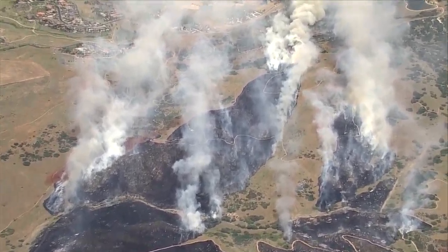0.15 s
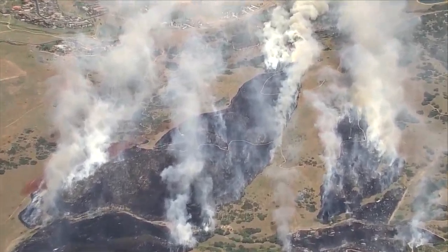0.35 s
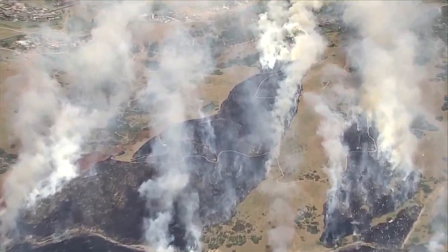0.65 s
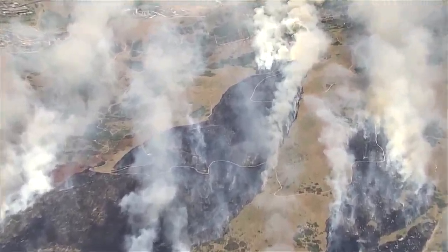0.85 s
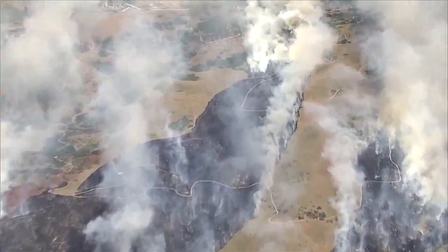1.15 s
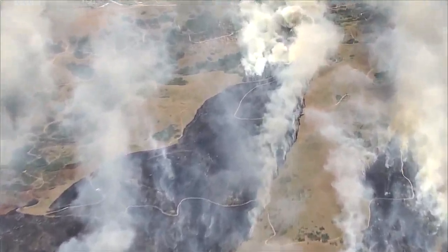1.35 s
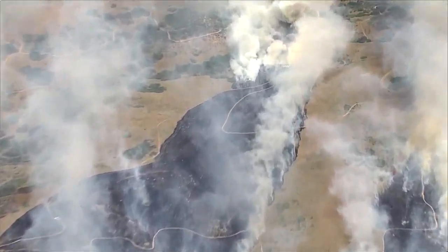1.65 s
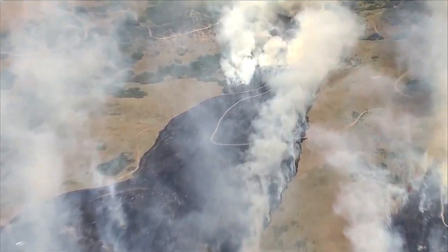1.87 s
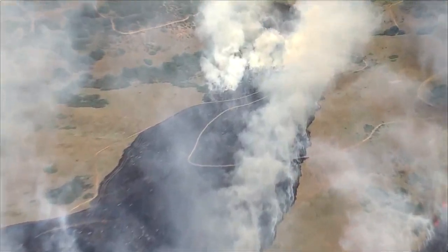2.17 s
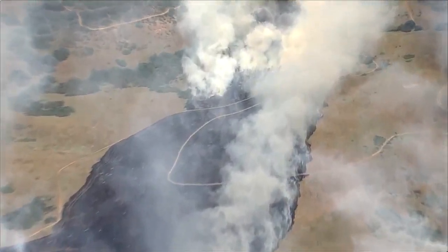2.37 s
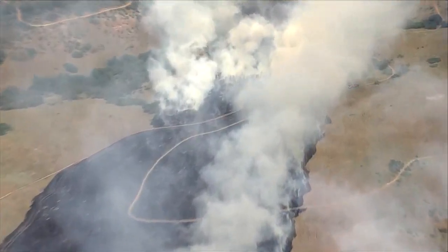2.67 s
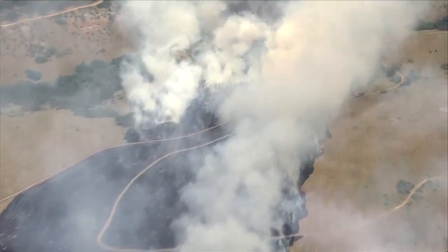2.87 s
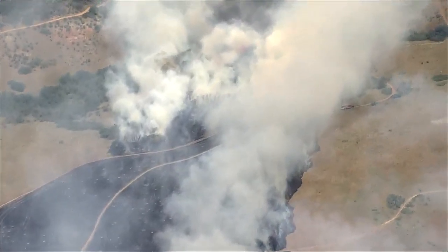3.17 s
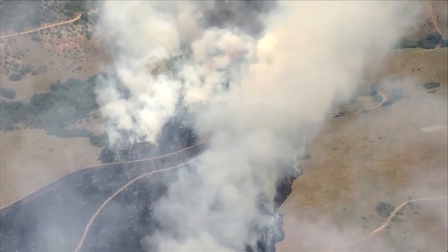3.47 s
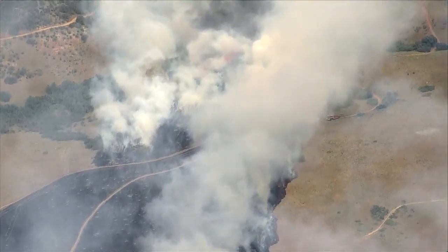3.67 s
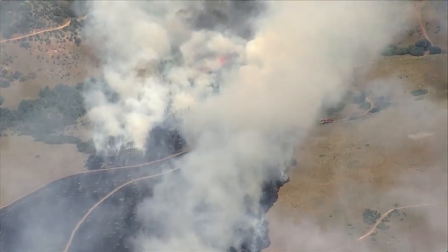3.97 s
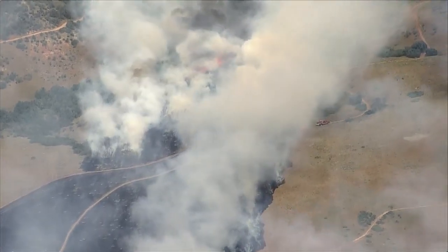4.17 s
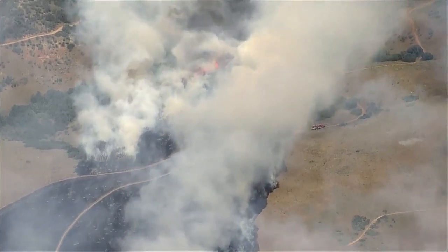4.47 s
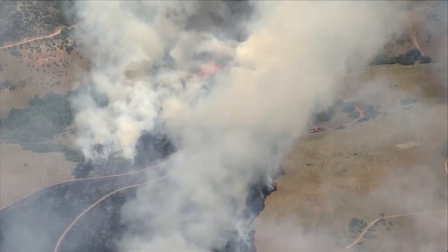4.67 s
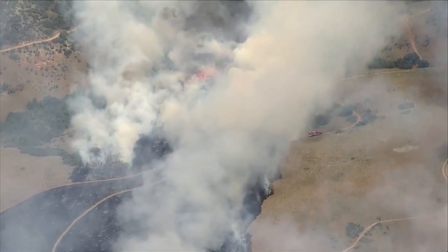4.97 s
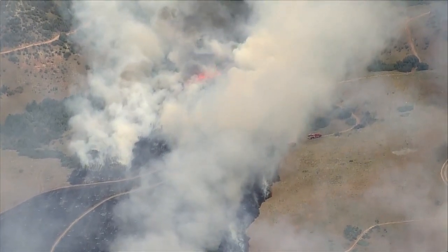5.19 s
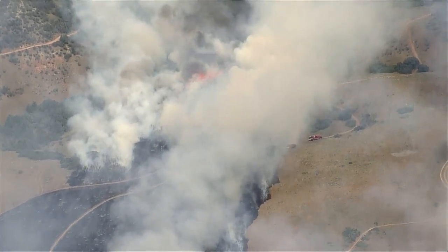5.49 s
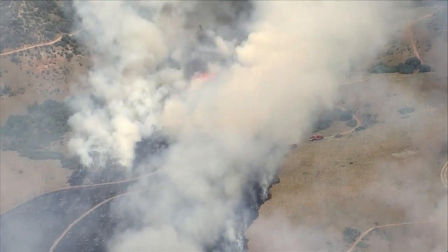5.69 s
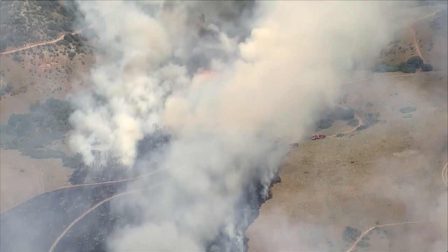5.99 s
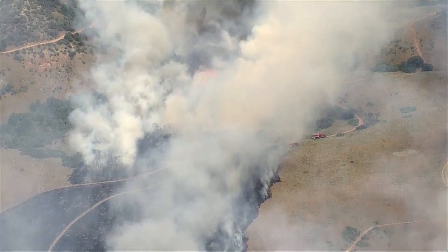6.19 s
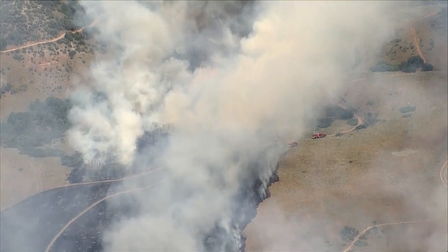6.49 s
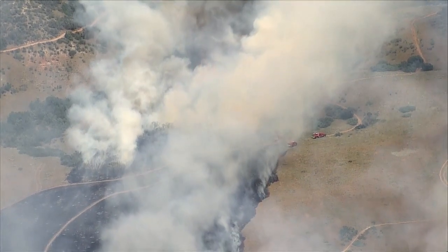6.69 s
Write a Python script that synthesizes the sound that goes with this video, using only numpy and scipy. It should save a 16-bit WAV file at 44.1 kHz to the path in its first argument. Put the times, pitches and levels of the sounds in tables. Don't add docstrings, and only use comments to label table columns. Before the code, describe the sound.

From 0 to about 7 seconds, a faint, unbroken drone from the cabin of a turbine helicopter in cruise, flying over smoking grassland. A low fan hum near 70 Hz and muffled rumble form the base. Above sit steady gear whines, strongest around 650, 1700 and 3300 Hz, with weaker tones between and above. Their pitch scarcely drifts, but they shimmer and throb several times a second. A soft broad rush of air fills the gaps. A tiny turbine whistle near 9 kHz swells and fades, dipping around 3.1 seconds and near the end. The thinnest top treble flutters on and off in tiny irregular steps, frequent early on, sparser around 5.8 to 6.3 seconds, then almost absent. The sound is close, dry and narrow, like a weak radio-linked camera microphone. No fire crackle, no distinct blade chop, no ending event.

```python
import sys
import numpy as np
from scipy import signal
from scipy.fft import rfft, irfft, next_fast_len
from scipy.io import wavfile
from scipy.ndimage import uniform_filter1d

SR = 44100
rng = np.random.default_rng(int(sys.argv[2]) if len(sys.argv) > 2 else 0)


def master(y):
    cut = np.clip(np.atleast_2d(y).T, -1, 1)
    pcm = np.round(cut * 32767)
    wavfile.write(sys.argv[1], SR, pcm.astype(np.int16))


def linear_from_db(decibels):
    return 10 ** (np.asarray(decibels, float) / 20)


N = 301644
T = np.arange(N) / SR

# f/Hz, level/dB
RUMBLE_SPECTRUM = [(20, -17.5), (27, -15.5), (31, -12), (36, -2), (46, -19.5), (55, -10), (64, -2),
                   (100, 0), (210, -4), (250, -2), (320, -7), (410, 1.5), (480, -8.5), (900, -22)]
# f/Hz, level/dB
RUSH_SPECTRUM = [(300, -9.5), (620, 0.5), (850, 1), (1060, -3.5), (1300, 1.5), (1720, -2.5), (2000, -1),
                 (2400, 1.5), (3300, -2), (3900, -5.5), (5150, -6.5), (5450, -8.5), (6000, -8.5),
                 (8000, -19.5)]
# f/Hz, width/Hz, depth/dB
MICROPHONE_DIPS = [(4250, 150, 1.5), (4850, 130, 2), (5440, 120, 3.5), (7400, 400, 3.5), (8250, 400, 2),
                   (10050, 250, 2)]
CABIN_MODE_HZ, CABIN_MODE_WIDTH_HZ, CABIN_MODE_DB, CABIN_SIDES_DB = 404, 16, 4, -2.5
# t/s, f/Hz, level/dB (rms)
CORE_WHISTLE = [(0, 8820, -89.5), (.24, 8833, -82), (.55, 8842, -82.5), (.8, 8838, -79),
                (1.22, 8817, -81.5), (1.9, 8805, -86), (2.3, 8812, -81), (2.7, 8818, -80.5),
                (3.1, 8813, -93), (3.62, 8823, -80), (3.95, 8816, -85), (4.4, 8811, -89),
                (4.66, 8806, -81.5), (5.1, 8813, -89), (5.37, 8823, -78.5), (5.72, 8830, -79.5),
                (6.11, 8820, -81.5), (6.45, 8807, -94)]
# t/s, blade f/Hz
FAN_SPEED = [(0, 69.7), (.6, 69.97), (1.15, 69.63), (1.85, 70.68), (2.25, 70.02), (2.68, 70.03),
             (2.93, 70.22), (3.22, 69.72), (3.95, 69.72), (4.4, 70.14), (4.68, 69.58), (5.13, 69.68),
             (5.6, 70.46), (5.9, 69.95), (6.15, 69.96), (6.84, 70.36)]
# multiple of blade f, level/dB
FAN_HARMONICS = [
    (.5, -31.5),
    (1, 1.5),
    (2, -5.5),
    (3, -13),
]
FAN_DB, FAN_SWELL_DB = -59, .5

ROTOR_HZ = 6.525
# t/s, departure/(parts per thousand)
ROTOR_DRIFT = [(0, -.65), (.15, -.92), (.72, 0), (1.03, -.17), (1.72, .79), (2.28, .05), (2.68, .43),
               (3.15, -.04), (3.68, .59), (4.26, .59), (4.6, .46), (5.04, -.33), (5.45, -.09), (5.76, .46),
               (6.02, .18), (6.42, .6), (6.7, .62), (6.84, .35)]
MESH_LOAD = {"bevel": (-0.86, 2.7, -0.3), "fourth": (1.2, 1.1, -0.63), "fifth": (0.74, -1.3, -0.14),
             "seventh": (.8, -1.2, -.12)}
# rotor order, level/dB (rms)
PUMP_LINES = [(208.0, -81.3), (260.0, -62.1), (468.0, -76.7), (520.0, -84.1), (572.0, -82.3),
              (624.0, -80.6), (676.0, -82.8), (780.0, -83.0), (884.0, -76.2), (936.0, -85.0),
              (988.0, -92.8), (1092.0, -95.9), (1300.0, -98.9)]
TAIL_LEVELS = [-77, -79, -78, -78, -80, -76]
TAIL_ORDER = 10.6
# rotor order, level/dB (rms)
SHAFT_LINES = [(5.99, -68.2), (9.0, -78.0), (15.55, -72.9), (95.82, -79.4), (106.78, -76.4),
               (171.04, -79.5), (177.66, -81.8), (221.0, -83.5), (224.25, -79.9), (279.88, -83.2),
               (295.42, -85.3), (440.0, -84.8), (810.0, -89.3), (875.56, -91.2), (885.01, -87.3),
               (886.29, -90.2), (914.34, -90.7), (923.0, -88.9), (932.94, -75.5), (944.99, -81.0),
               (951.6, -83.3), (959.34, -92.3), (1047.46, -88.8), (1057.34, -92.9), (1136.59, -86.2),
               (1143.19, -86.0), (1156.37, -87.7), (1162.98, -93.9), (1176.99, -94.6), (1258.85, -99.6),
               (5.3, -85.0), (139.12, -82.7), (147.33, -86.7), (160.0, -88.6), (186.71, -85.7),
                   (233.24, -85.6), (248.78, -86.3), (322.89, -86.5), (380.11, -84.6), (389.86, -82.8),
                   (529.74, -84.9), (539.99, -88.6), (649.99, -89.1), (760.0, -90.8), (785.0, -89.4),
                   (815.0, -95.2), (964.78, -92.3), (992.33, -94.5), (1026.23, -96.6), (1040.8, -93.7),
                   (1067.15, -97.7), (1109.73, -101.1), (1169.58, -98.9), (1177.49, -96.1),
                   (1189.84, -100.4), (1239.06, -100.7), (1252.22, -99.7), (1334.84, -101.3)]
FADE_DB, FADE_DB_PER_ORDER, FADES_PER_S = 1, .002, 1
# rotor order, level/dB (rms)
BEVEL_LINES = [(225.33, -84.7), (238.33, -79.0), (242.67, -81.7), (256.33, -82.8), (263.33, -71.4),
               (264.33, -54.0), (266.33, -82.3), (267.33, -81.6), (270.33, -77.4), (273.33, -84.5),
               (276.33, -83.6), (317.67, -87.0), (335.67, -80.7), (364.33, -83.4), (367.33, -80.3),
               (459.33, -86.0), (464.33, -85.7), (472.33, -87.3), (525.67, -85.5), (528.67, -72.6),
               (619.67, -88.5), (664.33, -86.3), (680.33, -91.5), (775.67, -87.2), (784.33, -89.6),
               (788.67, -88.3), (827.67, -98.2), (836.33, -91.6)]
BEVEL_MESH = 793 / 3
# rotor order, level/dB (rms)
PLANET_LINES = [(100.0, -56.5), (101.0, -81.2), (105.0, -84.3), (195.0, -81.3), (197.0, -80.8),
                (199.0, -79.9), (200.0, -72.0), (201.0, -76.2), (203.0, -83.7), (206.0, -82.2),
                (298.0, -82.8), (300.0, -70.3), (302.0, -82.6), (394.0, -84.2), (395.0, -83.6),
                (397.0, -84.9), (399.0, -77.1), (400.0, -62.0), (401.0, -76.5), (402.0, -78.4),
                (403.0, -79.7), (494.0, -83.7), (495.0, -72.5), (496.0, -83.3), (497.0, -85.2),
                (500.0, -59.0), (501.0, -79.9), (503.0, -85.5), (504.0, -84.8), (505.0, -76.9),
                (595.0, -82.5), (596.0, -87.3), (598.0, -87.2), (599.0, -85.5), (600.0, -79.1),
                     (601.0, -87.4), (602.0, -78.1), (605.0, -82.0), (695.0, -75.7), (698.0, -85.8),
                     (700.0, -65.6), (702.0, -88.4), (793.0, -78.1), (795.0, -77.7), (800.0, -84.8),
                     (802.0, -88.3), (805.0, -83.4), (895.0, -84.5), (898.0, -88.0), (900.0, -78.5),
                     (902.0, -83.6), (905.0, -84.0), (995.0, -93.8), (998.0, -85.5), (1003.0, -82.5),
                     (1004.0, -91.2), (1005.0, -87.3), (1195.0, -97.0), (1205.0, -102.2), (1305.0, -101.2)]
PLANET_PHASE = {200: -.46, 500: .3, 600: .45, 700: -.23, 800: .41, 900: -.13}

# from t/s, to t/s, share of frames sent (0-1)
TOP_SPELLS = [(0, .115, .8), (.26, .91, .79), (1.12, 1.24, .8), (1.34, 1.65, .92), (1.72, 2.47, .52),
              (2.585, 2.61, 1), (2.73, 3.5, .53), (3.52, 3.74, .78), (3.76, 4.2, .89), (4.22, 4.34, .6),
              (4.36, 4.55, 1), (4.6, 5.11, .48), (5.2, 5.44, .7), (5.51, 5.755, .9), (5.82, 6.31, .33),
              (6.64, 6.66, 1)]
UPPER_LOST = [1.579, 2.971, 3.283, 3.907, 4.363, 6.187, 6.451, 6.643]
# from t/s, to t/s
GAP_SENT = [(.155, .18), (.2, .245), (.73, .765), (4.075, 4.1)]
# f/Hz, level/dB
LINE_HISS = [(9000, -0.5), (11300, -11), (11900, 0.5), (14100, 0), (14600, -10), (22000, -13)]
FRAME_S, FIRST_FRAME_S, BIT_JITTER = .024, -.005, 1.3


def unit(x):
    return x / np.sqrt(np.mean(x ** 2) + 1e-20)


def curves(rows):
    s, *cols = np.transpose(rows)
    return [np.interp(T, s, c) for c in cols]


def wobble(rate):
    knots = int(N * rate / SR) + 4
    return np.interp(T * rate, np.arange(knots), rng.standard_normal(knots))


def waver(db, rate):
    knots = int(N * rate / SR) + 2
    gains = linear_from_db(db * rng.standard_normal(knots))
    slow = np.interp(T[::32] * rate, np.arange(knots), gains)
    return np.repeat(unit(slow).astype(np.float32), repeats=32)[:N]


def bell(hz, centre_hz, width_hz):
    return np.exp(-((hz - centre_hz) / width_hz) ** 2)


def filtered(x, response):
    m = next_fast_len(N + 8192, True)
    gain = response(np.fft.rfftfreq(m, 1 / SR)).astype(np.float32)
    return irfft(rfft(x.astype(np.float32), m) * gain, m)[:N]


def noise(spectrum):
    f, db = np.transpose(spectrum)
    response = lambda hz: linear_from_db(np.interp(np.log(hz + 1), np.log(f), db))
    return unit(filtered(rng.standard_normal(N), response))


def band(x, lo_hz, hi_hz, edge_hz):
    step = lambda u: np.sin(np.pi / 2 * np.clip(u / edge_hz + .5, 0, 1)) ** 2
    return filtered(x, lambda hz: step(hz - lo_hz) * step(hi_hz - hz))


def tone(turns, db, start=None):
    cycles = turns + (rng.random() if start is None else start)
    cycles -= np.floor(cycles)
    return np.float32(np.sqrt(2) * linear_from_db(db)) * np.sin(np.float32(2 * np.pi) * cycles.astype(np.float32))


def airflow():
    def cabin(hz):
        mode_db = CABIN_MODE_DB * bell(hz, CABIN_MODE_HZ, CABIN_MODE_WIDTH_HZ)
        sides_db = CABIN_SIDES_DB * bell(hz, CABIN_MODE_HZ, 4 * CABIN_MODE_WIDTH_HZ)
        return linear_from_db(-1.5 * bell(hz, 135, 25) + mode_db + sides_db)

    def microphone(hz):
        return linear_from_db(-sum(db * bell(hz, dip_hz, width_hz) for dip_hz, width_hz, db in MICROPHONE_DIPS))

    rumble_db = -60.5 + 0.28 * wobble(1.5) + 0.71 * wobble(9.5)
    rumble = linear_from_db(rumble_db) * filtered(noise(RUMBLE_SPECTRUM), cabin)
    casing = linear_from_db(-71.5) * unit(band(rng.standard_normal(N), 1665, 1760, 30))
    rush_db = -59 + 0.53 * wobble(1.4) + 0.62 * wobble(25)
    rush = linear_from_db(rush_db) * filtered(noise(RUSH_SPECTRUM), microphone)
    return rumble + casing + rush


def turbine_core():
    hz, db = curves(CORE_WHISTLE)
    turns = np.cumsum(hz + 1.8 * wobble(20)) / SR
    turns_13 = turns * 13 / 11
    order_11 = tone(turns, db + 2.5) + tone(18000 * T - turns, db + 2)
    order_13 = tone(turns_13, -79.5 + 2.5 * wobble(5))
    mirror_13 = tone(21000 * T - turns_13, -80 + 2.5 * wobble(5))
    return order_11 + order_13 + mirror_13


def fan():
    hz, = curves(FAN_SPEED)
    turns = np.cumsum(hz) / SR + .006 * wobble(9)
    blades = [tone(k * turns, level + 0.3 * wobble(8.4), 1 / 4) for k, level in FAN_HARMONICS]
    return linear_from_db(FAN_DB + FAN_SWELL_DB * wobble(2)) * sum(blades)


def rotor_turns():
    turns = np.cumsum(ROTOR_HZ * (1 + curves(ROTOR_DRIFT)[0] / 1000)) / SR
    shiver = 6e-5 * np.sin(2 * np.pi * .7 * turns) + 5e-5 * np.sin(2 * np.pi * 1.09 * turns)
    return turns + shiver


def load_db(mesh):
    start_db, db_per_thousandth, db_per_s = MESH_LOAD[mesh]
    return start_db + db_per_thousandth * curves(ROTOR_DRIFT)[0] + db_per_s * T


def shafts(turns):
    pump = sum(tone(order * turns, db, .34 * order / 260) * waver(.6, 3) for order, db in PUMP_LINES)
    tail = sum(tone((k + 1) * TAIL_ORDER * turns, db, 1 / 4) * waver(.8, 3)
               for k, db in enumerate(TAIL_LEVELS))
    lone = np.zeros(N, np.float32)
    for order, db in SHAFT_LINES:
        fade_db = FADE_DB + FADE_DB_PER_ORDER * order
        lone += tone(order * turns, db + 1.34) * waver(fade_db, FADES_PER_S)
    return pump + tail + lone


def bevel_mesh(turns):
    out = np.zeros(N, np.float32)
    for order, db in BEVEL_LINES + [(BEVEL_MESH + 1, -76)]:
        side = round(order - BEVEL_MESH, 1)
        exact = round(3 * order) / 3
        start = .37 * side if abs(side) <= 1 else None
        out += tone(exact * turns, db, start) * waver(.5, 3)
    return linear_from_db(load_db("bevel") + 0.83 + 0.33 * wobble(9)) * out


def planet_stage(turns):
    swell = {4: linear_from_db(load_db("fourth")), 5: linear_from_db(load_db("fifth")), 7: linear_from_db(load_db("seventh"))}
    lag = rng.random((15, 9))
    out = np.zeros(N, np.float32)
    for order, db in PLANET_LINES:
        mesh = round(order / 100)
        side = round(order - 100 * mesh)
        delay = lag[mesh, abs(side)]
        if abs(side) == 5:
            delay = PLANET_PHASE.get(100 * mesh, 0)
        start = lag[mesh, 0] - np.sign(side) * delay
        if mesh == 4 and side != 0:
            start -= 1 / 4
        line = tone(order * turns, db + 0.14 * mesh / 2, start)
        out += line * waver(0.5 + 0.03 * mesh, 3.495) * swell.get(mesh, 1)
    return out


def scene():
    turns = rotor_turns()
    background = airflow() + turbine_core() + fan()
    return (background + shafts(turns) + bevel_mesh(turns) + planet_stage(turns))[None]


def frames(spans):
    on = np.zeros(N)
    for start, stop in spans:
        on[round(start * SR):round(stop * SR)] = 1
    return uniform_filter1d(uniform_filter1d(on, size=180), size=180)


def top_frames():
    starts = np.arange(FIRST_FRAME_S, N / SR, FRAME_S)
    costs = 1 / 2 + BIT_JITTER * (rng.random(len(starts)) - 1 / 2)
    middles = starts + FRAME_S / 2
    sent = []
    for first, last, share in TOP_SPELLS:
        inside = (middles > first) & (middles < last)
        spare = 1
        for s, cost in zip(starts[inside], costs[inside]):
            if spare >= cost or share == 1:
                sent.append((max(s, 0), s + FRAME_S))
                spare -= 1
            spare += share
    return frames(sent)


def radio_link(x):
    top_on = top_frames()
    lost = band(frames((s, s + FRAME_S) for s in UPPER_LOST) * x, 8250, SR, 300)
    low = band(x - lost, -100, 8960, 640)
    gap = linear_from_db(-8) * band(frames(GAP_SENT) * x, 9200, 9750, 400)
    switched = band(top_on * band(x, 9500, 10900, 300), 9000, 10570, 330)
    top = linear_from_db(-2) * band(switched, 9800, SR, 640)
    image = linear_from_db(-104.5) * top_on * unit(band(rng.standard_normal(N), 15000, 15750, 300))
    return low + gap + top + image + linear_from_db(-93) * noise(LINE_HISS)


def low_pass(x):
    return signal.sosfilt(signal.butter(12, 15700, fs=SR, output="sos"), x)


def record(dry):
    heard = dry[0] - .3 * band(dry[0], 7800, 8740, 200)
    return low_pass(radio_link(heard)[None])


dry = scene()
out = record(dry)
master(out)
```